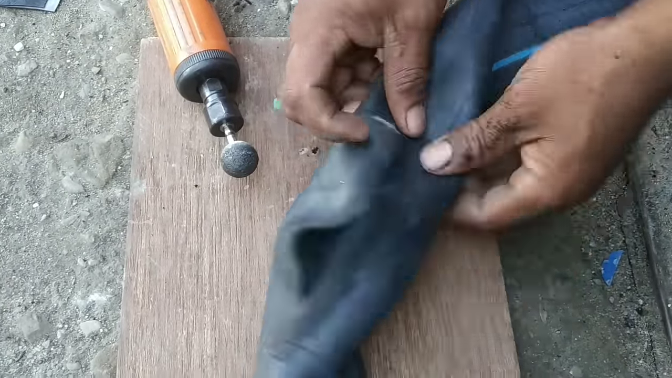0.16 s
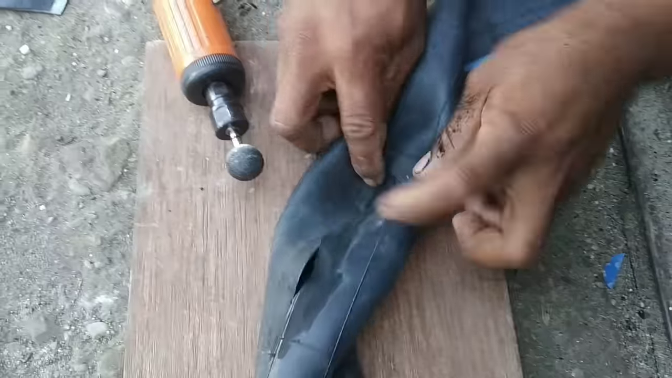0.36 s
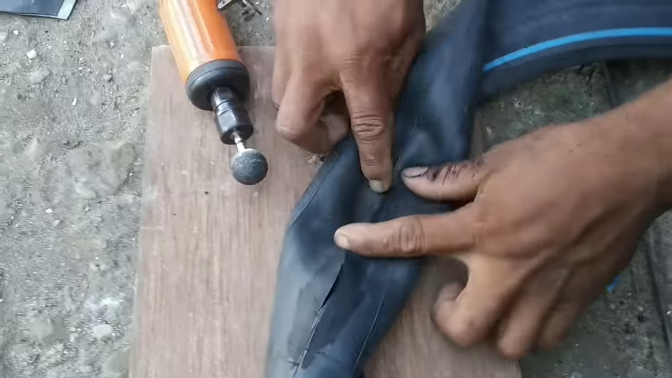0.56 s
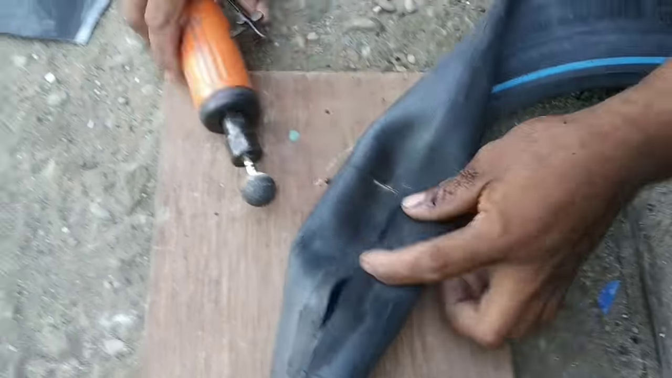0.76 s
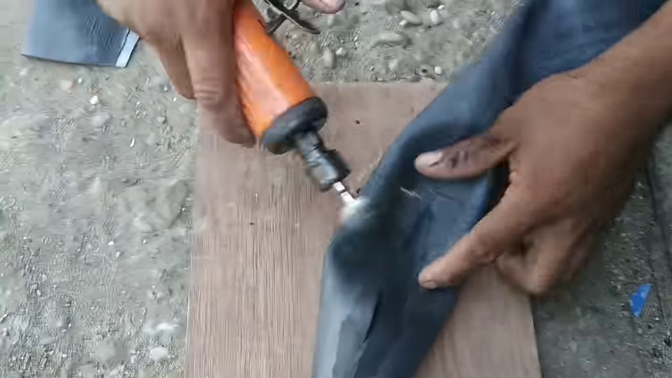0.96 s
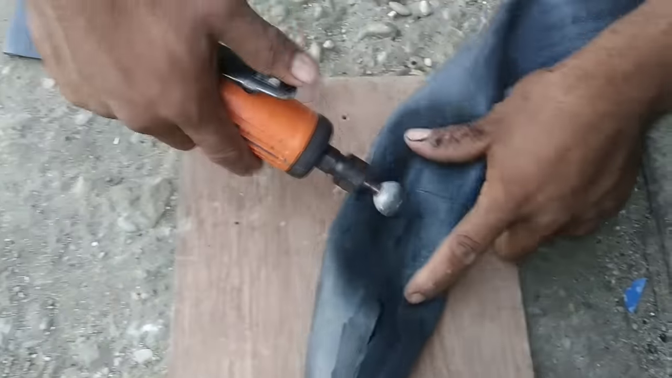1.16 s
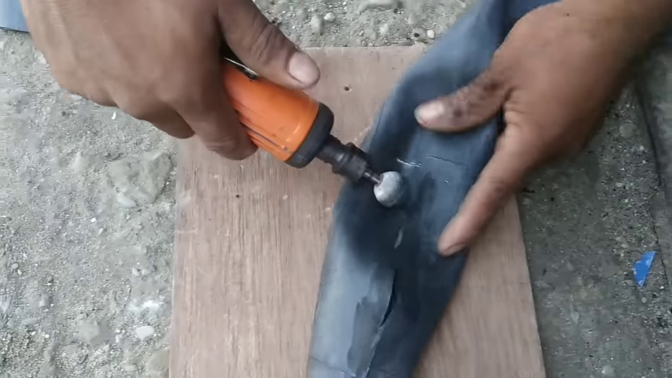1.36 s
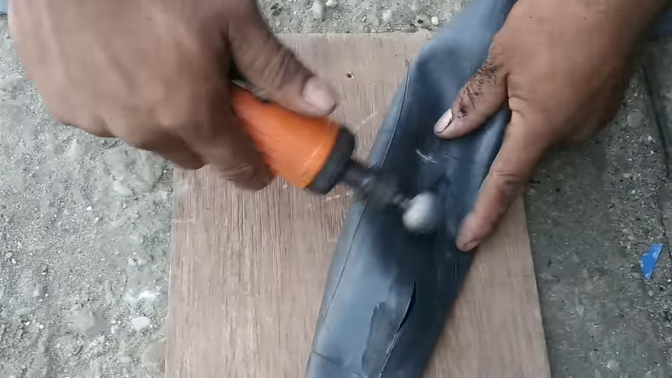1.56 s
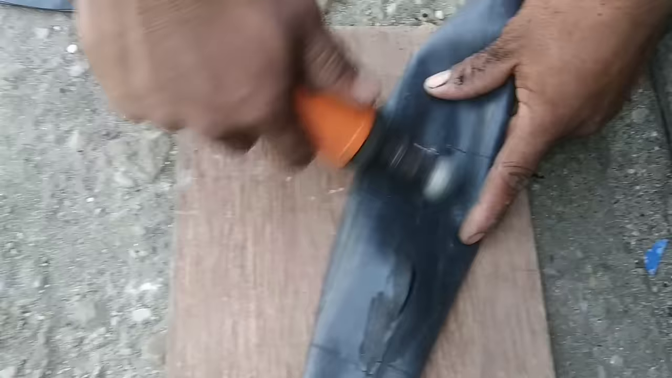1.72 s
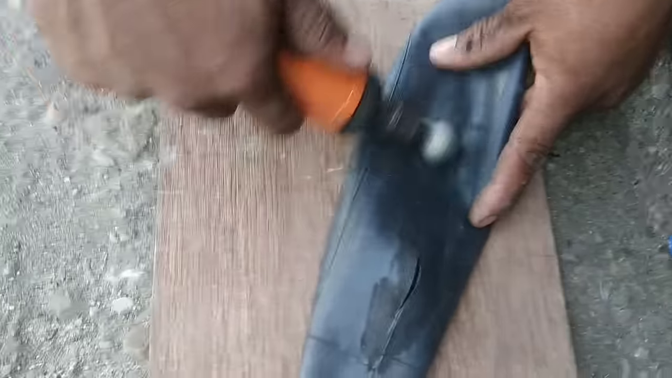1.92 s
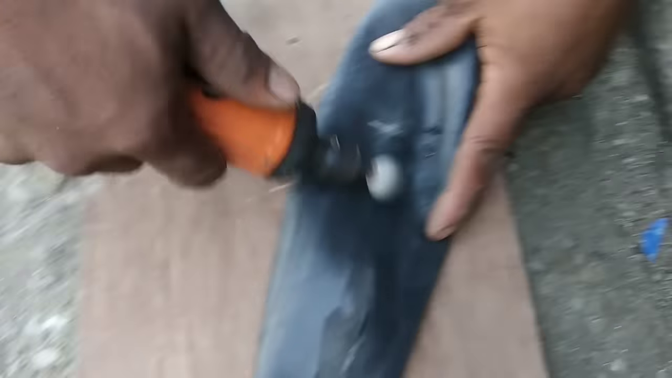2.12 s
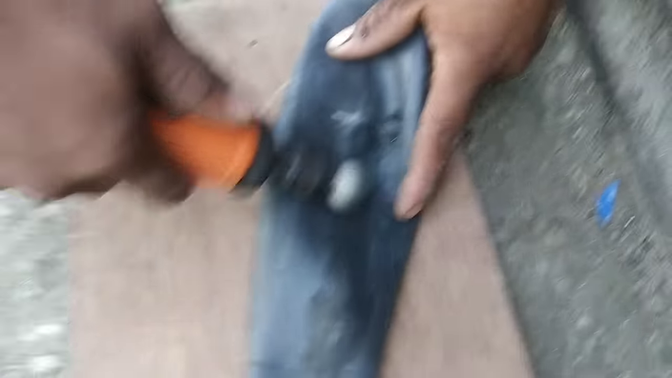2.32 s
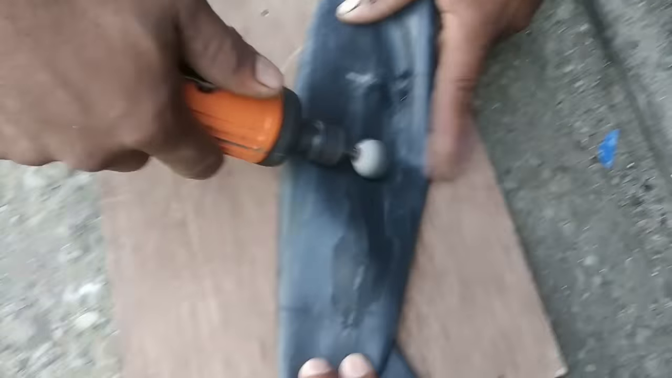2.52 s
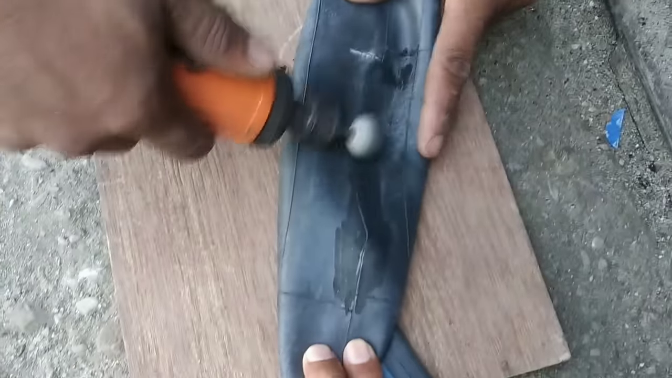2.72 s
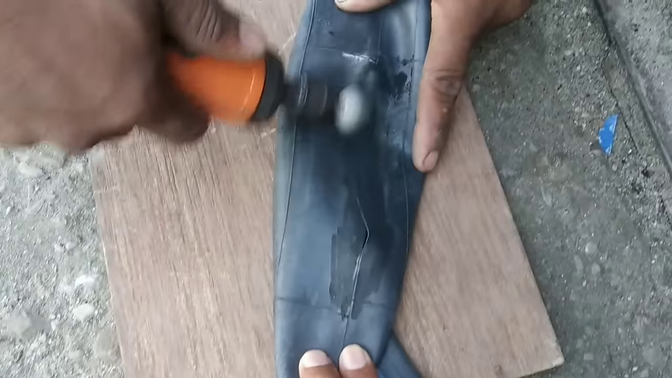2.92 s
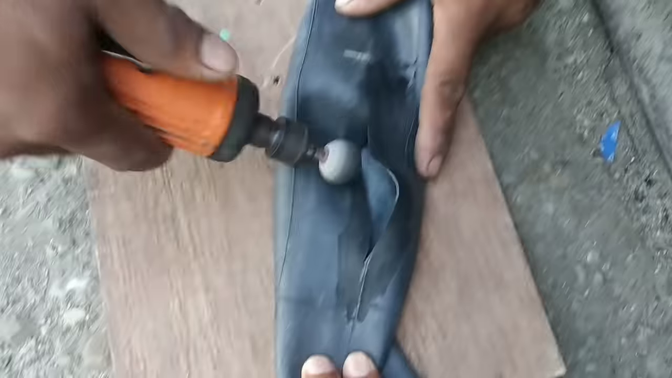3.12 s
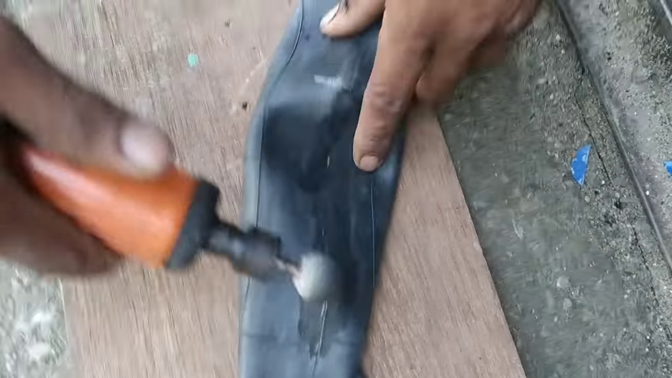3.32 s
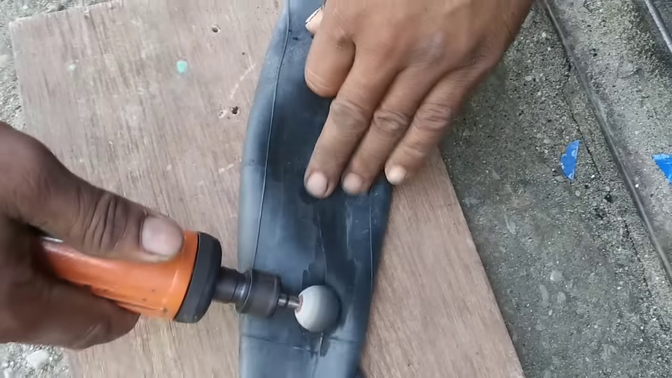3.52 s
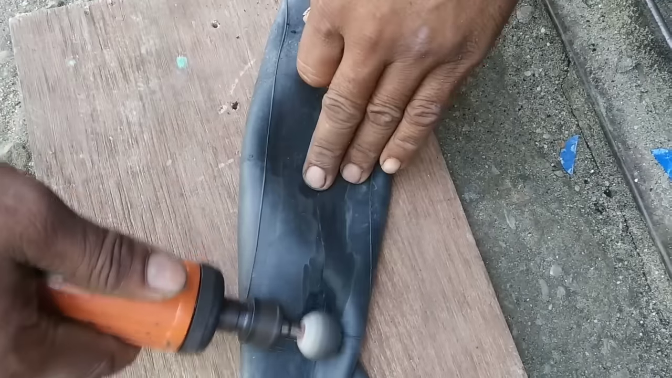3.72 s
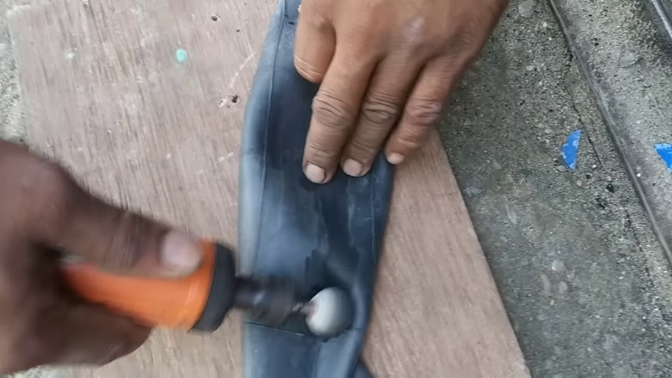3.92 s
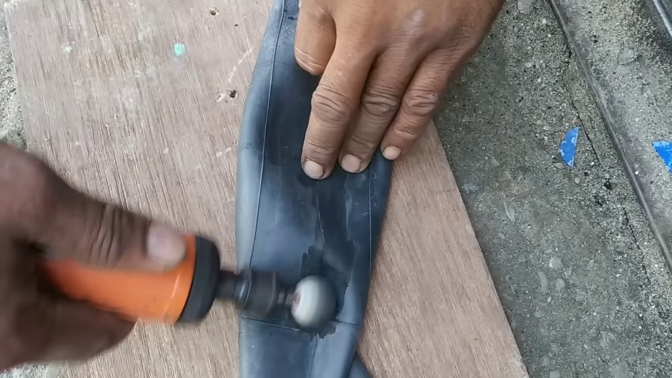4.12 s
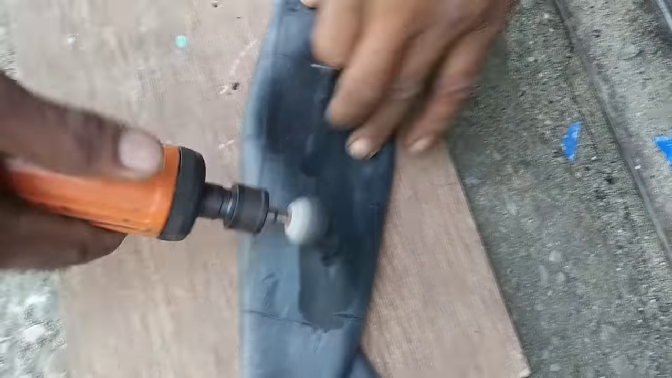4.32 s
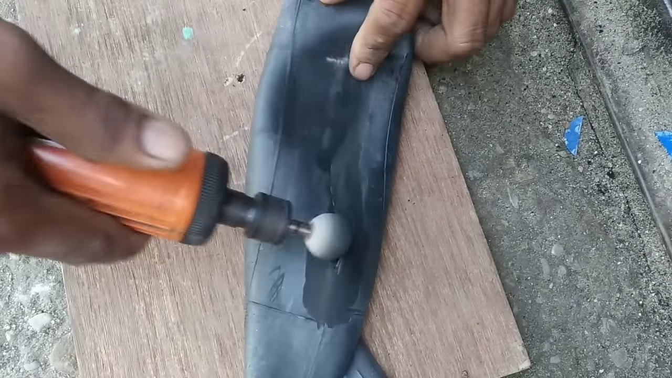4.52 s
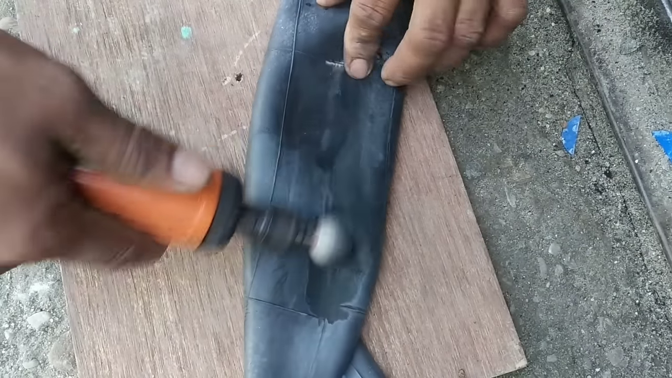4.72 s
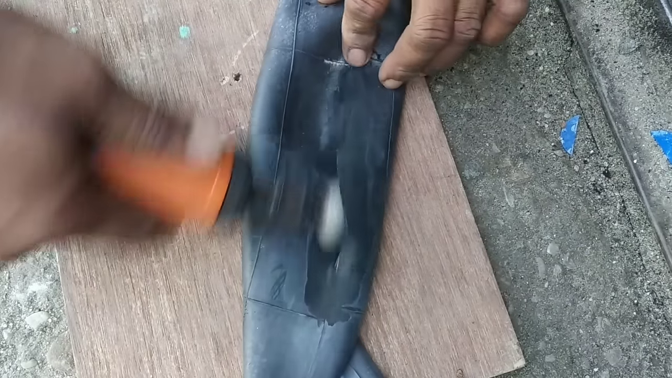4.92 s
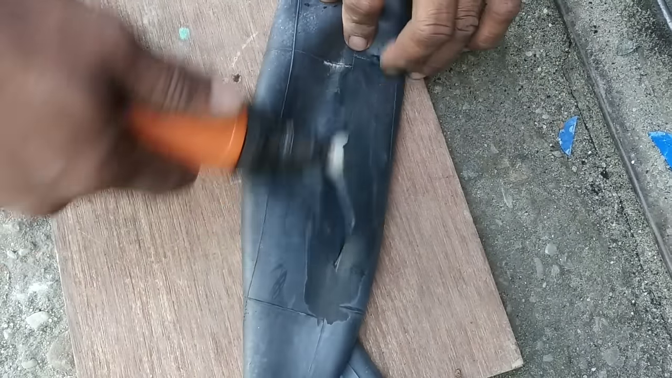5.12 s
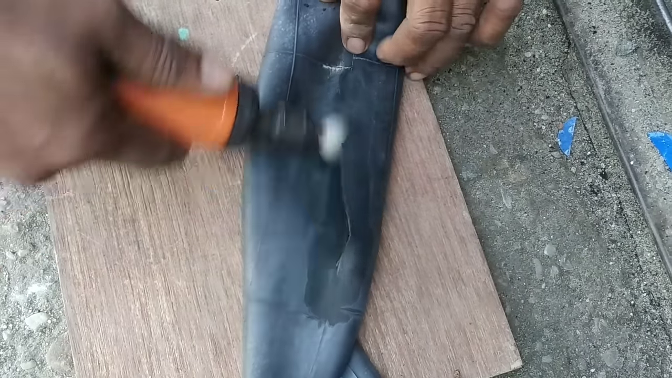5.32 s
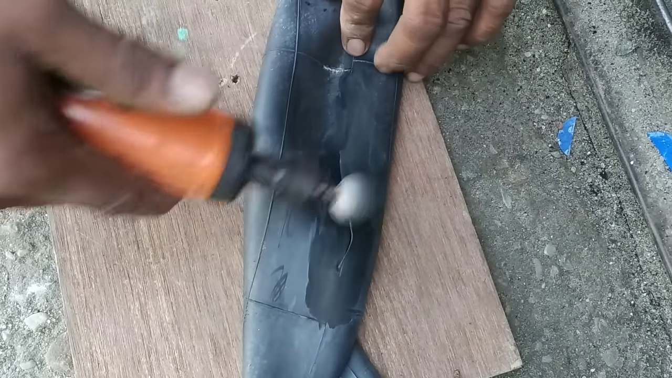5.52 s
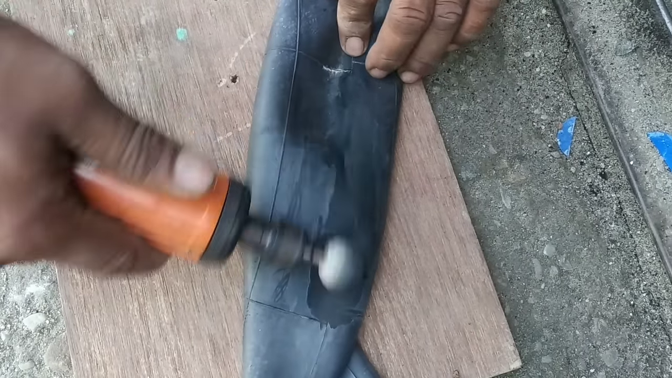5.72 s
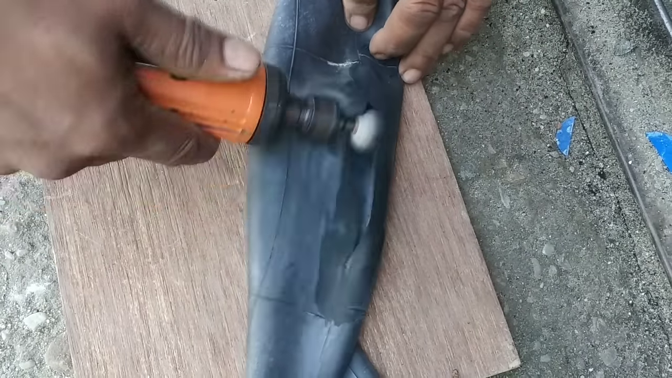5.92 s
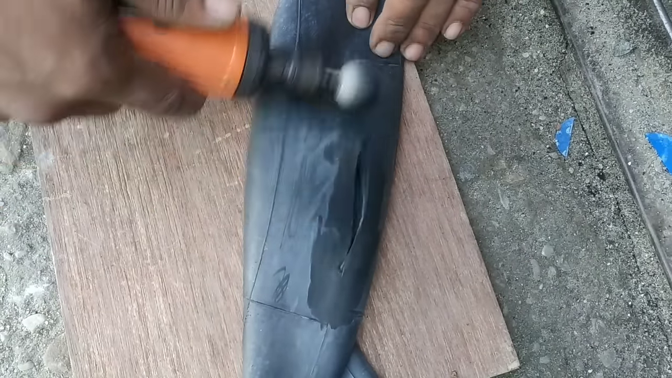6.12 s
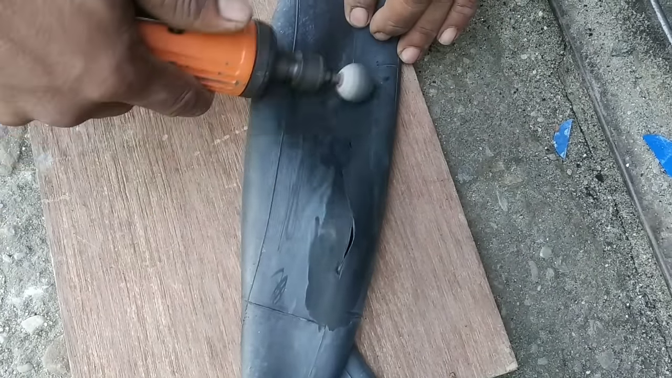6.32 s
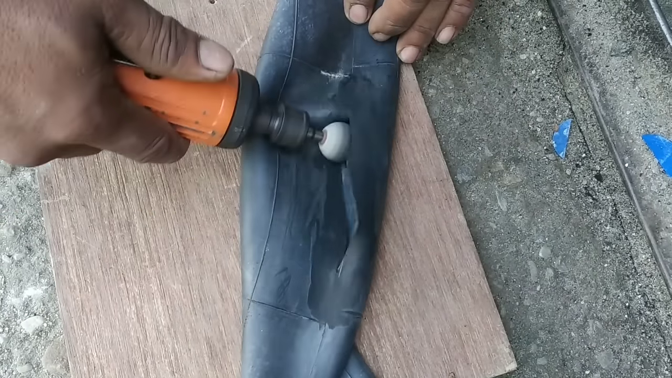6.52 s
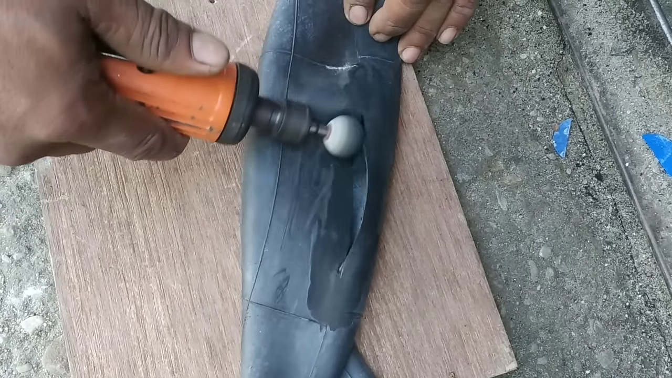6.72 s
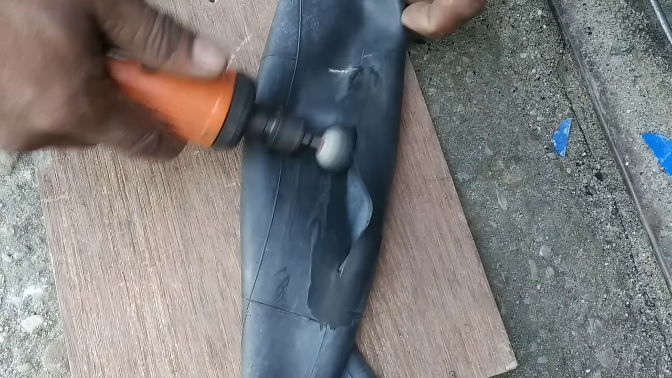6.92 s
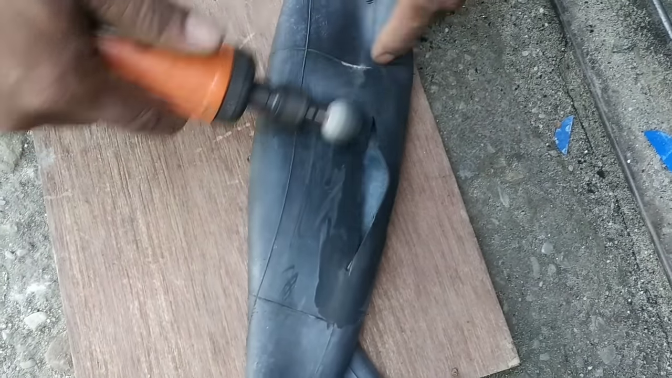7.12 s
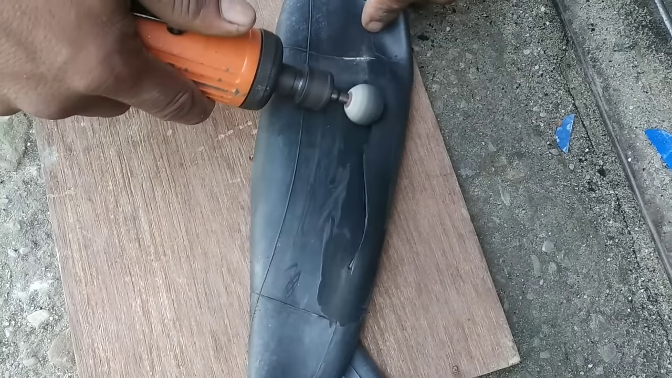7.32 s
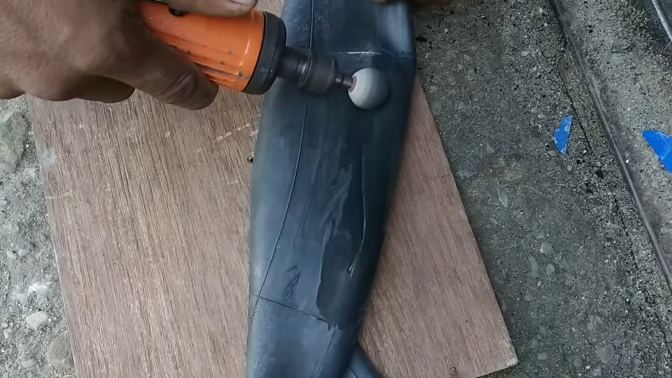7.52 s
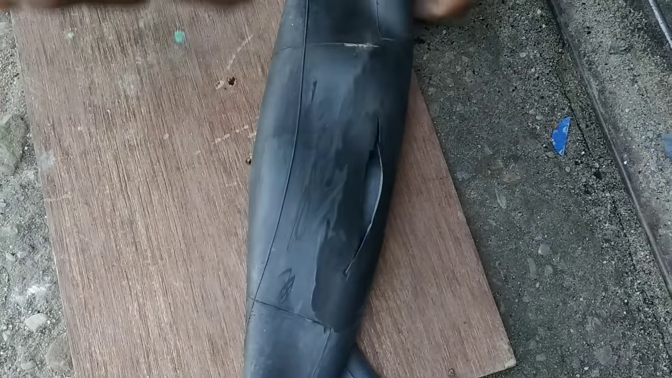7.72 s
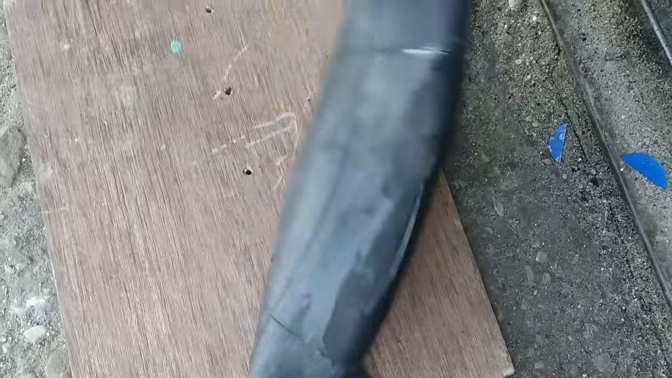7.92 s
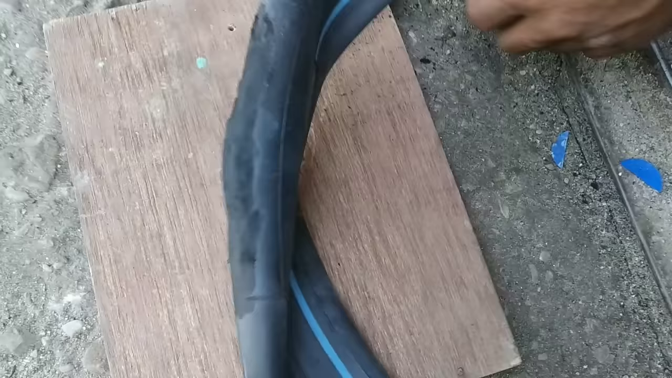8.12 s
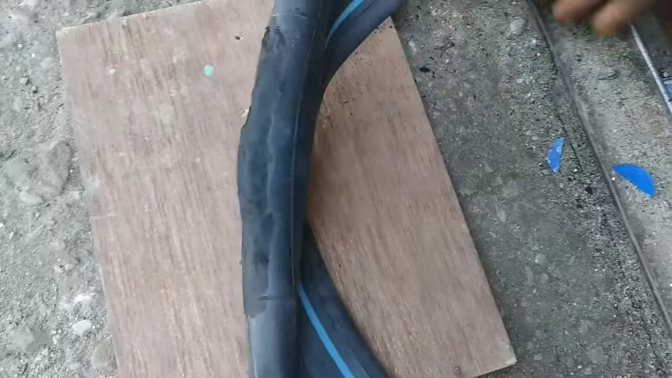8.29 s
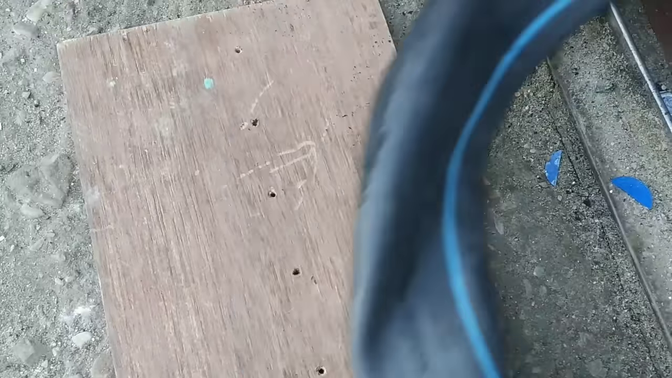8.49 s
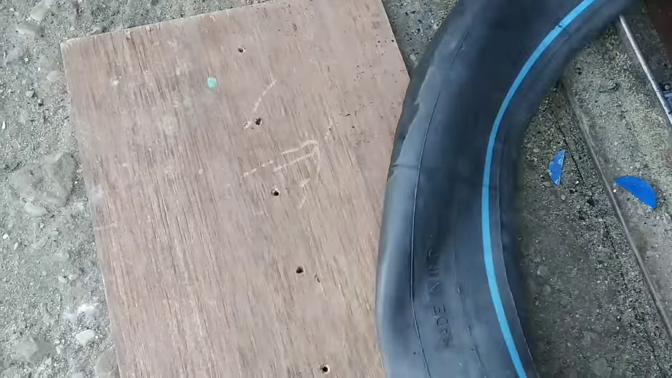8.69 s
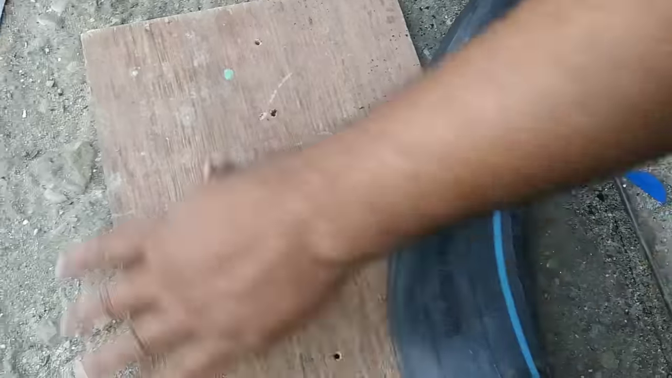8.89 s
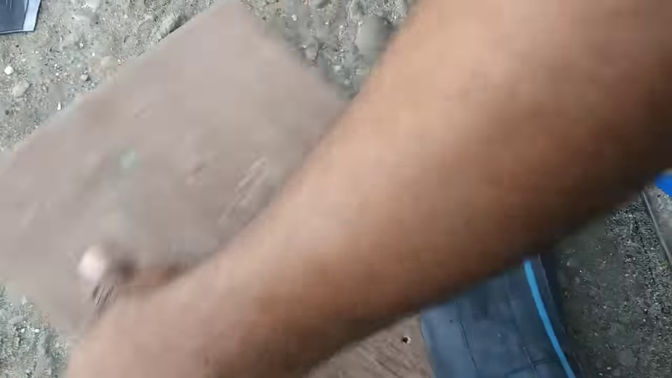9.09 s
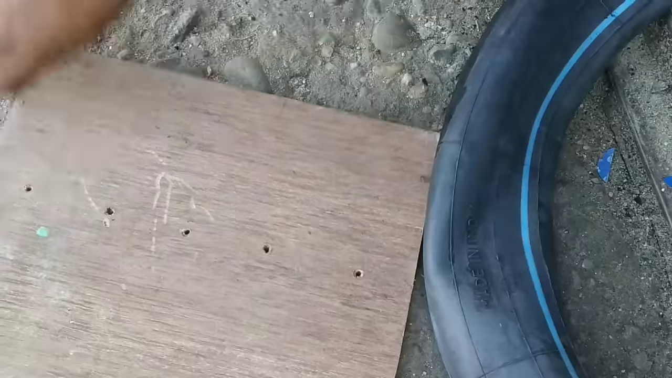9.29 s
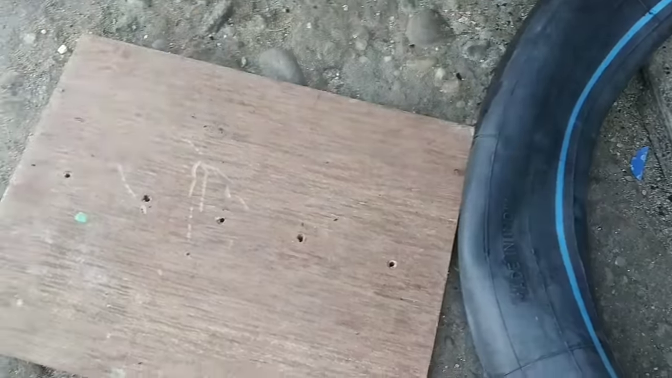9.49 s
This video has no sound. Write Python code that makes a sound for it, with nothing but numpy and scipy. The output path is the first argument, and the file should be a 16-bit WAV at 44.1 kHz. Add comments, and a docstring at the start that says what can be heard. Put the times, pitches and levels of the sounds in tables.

```python
"""An air die grinder buffs a rubber inner tube on a plywood board, in four short spells, in a workshop.
Like a siren, its four-vane motor chops the exhaust into a whine, heard over the loud hiss of turbulent
air; the pitch falls whenever the stone bites into the rubber and loads the rotor.
Around it are roadside traffic rumble, a leaking air coupling, fingers rubbing the tube, two toots of a
far motorbike horn, and the modes of the board, rung by knocks and by dragging over concrete."""
import sys
import numpy as np
from scipy import signal
from scipy.fft import rfft, irfft, next_fast_len
from scipy.io import wavfile

SR = 44100
rng = np.random.default_rng(int(sys.argv[2]) if len(sys.argv) > 2 else 0)


def file_out(sig):
    """Save sig as 16-bit WAV at sys.argv[1]."""
    # one column per channel
    cols = np.atleast_2d(sig).T
    # limit, then scale
    lim = np.clip(cols, -1, 1)
    pcm = np.round(lim * 32767).astype(np.int16)
    wavfile.write(sys.argv[1], SR, pcm)


N = 421155
T = np.arange(N) / SR


def from_db(db):
    """Amplitude ratio of a level in decibels."""
    return np.exp(np.maximum(db, -300) * (np.log(10) / 20))


def unit_rms(x):
    """Normalisation to unit power."""
    return x / np.sqrt(np.mean(x ** 2) + 1e-20)


def in_time(rows):
    """Linear interpolation in time, one curve for each column after the first."""
    times_s, *columns = np.transpose(rows)
    return [np.interp(T, times_s, column) for column in columns]


def at_hz(points, hz):
    """Interpolation on a logarithmic frequency axis."""
    points_hz, values = np.transpose(points)
    return np.interp(np.log(np.maximum(hz, 1)), np.log(points_hz), values)


def ramp(start_s, length_s):
    """Linear rise from 0 to 1."""
    return np.clip((T - start_s) / length_s, 0, 1)


def bump(centre_s, width_s):
    """Gaussian pulse of height 1."""
    return np.exp(-np.minimum(((T - centre_s) / width_s) ** 2, 40))


def stroke(start_s, end_s, level_db, fade_db_per_s=443):
    """Envelope of a rub: a plateau with exponential rise and decay."""
    return from_db(level_db - fade_db_per_s * np.abs(T - np.clip(T, start_s, end_s)))


def drift(rate_hz):
    """Low-pass noise: a smooth random wander of spread 1."""
    step = 40   # samples between computed points
    pole = np.exp(-2 * np.pi * rate_hz * step / SR)
    white = rng.standard_normal(N // step + 2002)
    slow = unit_rms(signal.lfilter([1], [1, -2 * pole, pole * pole], white)[2000:])
    return np.interp(np.arange(N) / step, np.arange(len(slow)), slow)


def sine(phase):
    """Sinusoid of a phase wrapped to one cycle."""
    return np.sin((phase % (2 * np.pi)).astype(np.float32))


def band(x, low_hz, high_hz):
    """Butterworth band-pass filter."""
    return signal.sosfilt(signal.butter(2, [low_hz, high_hz], "band", fs=SR, output="sos"), x + 1e-18)


def ring(force, hz, t60_s):
    """Damped oscillator: a unit impulse starts a decaying sine of height 1."""
    pole, angle = from_db(-60 / (t60_s * SR)), 2 * np.pi * hz / SR
    return signal.lfilter([0, np.sin(angle)], [1, -2 * pole * np.cos(angle), pole * pole], force + 1e-18)


def pan(balance_db):
    """Level difference, left over right, at constant total power."""
    gains = from_db(np.array([[.5], [-.5]]) * balance_db)
    return gains / np.sqrt(np.mean(gains ** 2, axis=0))


def delayed(x, delay_s):
    """Time delay, fixed or varying."""
    return np.interp(T - delay_s, T, x)


def stereo(x, lag_s):
    """Arrival-time difference: the left channel lags the right."""
    return np.array([delayed(x, lag_s), x])


# Likeness of left and right in the noise field: frequency_hz, coherence (0-1)
COHERENCE = [(100, 0.99), (400, 0.87), (1500, 0.04), (4000, 0.09), (15000, 0)]


def noise_field(spectrum, lag_s=0, balance=((1, 0), (2, 0))):
    """Partial coherence: a shared direct wave plus independent scattered waves, coloured, at rms 1."""
    size = next_fast_len(N)
    hz = np.arange(size // 2 + 1) * SR / size
    direct, *scattered = rfft(rng.standard_normal((3, size)))
    coherence = at_hz(COHERENCE, hz)
    lag = np.exp(-2j * np.pi * hz * [[lag_s], [0]])
    field = np.sqrt(coherence) * direct * lag + np.sqrt(1 - coherence) * np.array(scattered)
    low_hz, high_hz = spectrum[0][0] / 2, spectrum[-1][0] * 2
    skirts = 1 / np.sqrt((1 + (low_hz / (hz + 1)) ** 4) * (1 + (hz / high_hz) ** 4))
    colour = skirts * from_db(at_hz(spectrum, hz))
    return unit_rms(irfft(field * colour * pan(at_hz(balance, hz)), size)[:, :N])


# Spectra of the traffic and of the air leak: frequency_hz, density_db
TRAFFIC_SPECTRUM = [(25, -1.5), (54, 3), (110, 1), (160, 0), (275, -12.5), (640, -16), (1100, -24),
                    (2000, -37)]
LEAK_SPECTRUM = [(1500, -0.5), (2500, 3), (3400, 0), (5400, 0.5), (7200, 5.5), (9500, 6.5), (12000, 3),
                 (15500, 3)]
# Slow course of both: time_s, rumble_db, leak_db
BACKGROUND_LEVELS = [(0, -45, -47), (.8, -44.5, -45.5), (1.4, -45.5, -45.5), (3.3, -41, -40),
                     (5.5, -40.5, -43), (7.9, -46, -45.5), (8.6, -48.5, -47.5), (9.55, -50, -48)]


def traffic_and_leak(vane_hz, sink_db=-23):
    """Broadband noise of traffic and a leaking coupling; the rumble sinks while the tool is at speed."""
    held_hz = np.maximum(delayed(vane_hz, 0.015), delayed(vane_hz, 0.024))   # it returns a little late
    running = np.clip(held_hz / 950, 0, 1) ** 0.73
    rumble_db, leak_db = in_time(BACKGROUND_LEVELS)
    rumble = from_db(rumble_db + sink_db * running + 1.44 * drift(12.6)) * noise_field(TRAFFIC_SPECTRUM)
    leak = from_db(leak_db + 1.1 * drift(27)) * noise_field(LEAK_SPECTRUM)
    return rumble + leak


# Fingers rubbing the tube: start_s, end_s, centre_hz, level_db
FINGER_RUBS = [(0, 0.098, 2480, -53.5), (0.187, 0.266, 2450, -59), (.9, 0.983, 4470, -52),
               (7.892, 7.97, 4500, -48), (8.273, 8.3, 4500, -55), (8.407, 8.493, 3900, -52)]


def fingers(edge_ratio=1.19, grip_db=3):
    """Stick-slip friction of skin on rubber: bands of noise that flutter as the grip changes."""
    rubs = 0
    for start_s, end_s, hz, level_db in FINGER_RUBS:
        friction = unit_rms(band(rng.standard_normal(N), hz / edge_ratio, hz * edge_ratio))
        rubs += stroke(start_s, end_s, level_db) * friction
    return stereo(rubs * from_db(grip_db * drift(70)), lag_s=0.0001)


# Toots of the far horn: start_s, end_s, level_db
HORN_TOOTS = [(0.471, 0.545, -50), (0.66, 0.742, -48.5)]
# Its spectrum: harmonic_number, gain_db
HORN_HARMONICS = [(6, -19), (7, -2), (8, -1.5), (9, -10.5), (12, -14)]
# Reflections from house fronts: delay_s, gain_db
HOUSE_ECHOES = [(0.0121, -6), (.029, -21), (.058, -14)]


def horn(pitch_hz=401, edge_s=0.023, waver=0.007, rough_rad=0.04, rough_db=5):
    """Forced vibration: a buzzing diaphragm rings a tone disc near 3 kHz, blurred by street echoes."""
    phase = 2 * np.pi * np.cumsum(pitch_hz * (1 + waver * drift(39))) / SR + rough_rad * drift(160)
    gate = sum(from_db(db) * np.clip(np.minimum(T - start_s, end_s - T) / edge_s + .5, 0, 1)
               for start_s, end_s, db in HORN_TOOTS)
    buzz = sum(from_db(db + rough_db * drift(60)) * np.sin(k * phase) for k, db in HORN_HARMONICS)
    toots = np.sqrt(2) * gate * buzz
    echoes = sum(from_db(db) * delayed(toots, delay_s) for delay_s, db in HOUSE_ECHOES)
    return stereo(toots + echoes, lag_s=0.00005)


# Knocks and jolts of the board: time_s, blow_db, crack_db
BOARD_KNOCKS = [(0.599, -28.5, -60), (0.92, -36, -56), (0.992, -38, -64), (8.034, -36, -52),
                (8.151, -38, -65), (8.324, -30.5, -49), (8.358, -38, -64), (8.582, -35.5, -63),
                (8.935, -32, -62), (9.001, -26, -60), (9.028, -26, -44), (9.074, -19.5, -52),
                (9.088, -25.5, -45), (9.117, -25, -39), (9.146, -31, -31), (9.163, -22, -57),
                (9.173, -19.5, -47), (9.209, -19, -33.5), (9.247, -22, -57), (9.279, -21, -44),
                (9.303, -21, -43), (9.328, -22, -50)]


def impacts(crunch=0.087, rise_s=0.0029, crunch_s=0.0085, crack_s=0.0035):
    """Impulsive excitation: each knock crushes grit, giving a rough blow and a brief crack."""
    lead = SR // 100   # grit gives way just before the jolt
    age_s = T[:SR // 20] - T[lead]
    onset, since_s = np.exp(np.minimum(age_s, 0) / rise_s), np.maximum(age_s, 0)
    blows, cracks = np.zeros(N), np.zeros(N)
    for time_s, blow_db, crack_db in BOARD_KNOCKS:
        at = round(time_s * SR)
        span = slice(at - lead, at - lead + len(age_s))
        grit = onset * rng.standard_normal(len(age_s))
        blows[at] += from_db(blow_db)
        blows[span] += from_db(blow_db) * crunch * grit * np.exp(-since_s / crunch_s)
        cracks[span] += from_db(crack_db) * grit * np.exp(-since_s / crack_s)
    return blows, cracks


# Modes of the plywood: frequency_hz, gain_db, free_t60_s
PLYWOOD_MODES = [(352, -12, 0.029), (490, -8, 0.022), (663, -6.5, 0.072), (773, -6, 0.091),
                 (920, -3.5, 0.097), (1070, -1, 0.013), (1293, -0.5, 0.026), (1530, -1, 0.017),
                 (1820, -4, 0.031), (2020, -6.5, 0.019), (2730, -13, 0.019), (4000, -5, 0.0059),
                 (5000, -10, 0.0063)]
# Rubber and board sliding: start_s, end_s, level_db
BOARD_SLIDES = [(7.918, 7.973, -57), (8.423, 8.467, -49), (9.023, 9.146, -45.5), (9.16, 9.357, -43)]


def board(knock_gain_db=-8.5, crack_gain_db=12, grit_gain_db=-16, grains_per_s=700, jammed_ratio=0.45):
    """Modal vibration: knocks and sliding grains ring the plywood; ground contact damps the knocks."""
    blows, cracks = impacts()
    grains = (rng.random(N) < grains_per_s / SR) * rng.standard_normal(N)
    sliding = sum(stroke(*slide) for slide in BOARD_SLIDES)
    knocks, scrape = 0, 0
    for k, (hz, gain_db, free_t60_s) in enumerate(PLYWOOD_MODES):
        contact_db = 4.1 * np.array([drift(9.4), drift(13)])   # the point of contact wanders
        coupling = (-1) ** k * from_db(gain_db + contact_db)
        knocks += coupling * ring(blows, hz, free_t60_s * jammed_ratio)
        scrape += coupling * ring(grains, hz, free_t60_s)
    wood = from_db(knock_gain_db) * knocks + sliding * unit_rms(scrape)
    grit = from_db(crack_gain_db) * cracks + from_db(grit_gain_db) * sliding * unit_rms(grains)
    return wood * pan(-1.2) + stereo(band(grit, 1600, 7300), lag_s=0.0001)


VANES, WORKING_HZ = 4, 1200   # WORKING_HZ is the nominal vane-passing frequency
TOOL_LAG_S = 0.0003383   # the tool's sound reaches the left channel later
# Spells of grinding: pressed_s, at_speed_s, released_s, free_vane_hz, air_db
GRINDING_SPELLS = [(1.452, 1.575, 3.102, 1205, -35.8), (3.338, 3.47, 4.296, 1148, -35.3),
                   (4.447, 4.52, 5.388, 1180, -35.5), (5.49, 5.585, 7.667, 1158, -35.9)]


def motor(grab=0.04, valve_s=0.03, coast_s=0.04, coast_power=3.5, air_db_per_hz=0.03, bleed_db_per_s=97):
    """Air drive against friction: vane-passing frequency and air flow through run-up, work and coast."""
    lost_hz = drag() * (1 + grab * drift(20))   # the rubber grips unevenly
    vane_hz, flow = 0, 1e-5
    for pressed_s, at_speed_s, released_s, free_hz, air_db in GRINDING_SPELLS:
        run_up = ramp(pressed_s, at_speed_s - pressed_s) ** 1.6
        since_s = np.maximum(T - released_s, 0)
        coast = (1 + since_s / (coast_power * coast_s)) ** -coast_power   # falls fast, then lingers
        loaded_hz = free_hz - lost_hz
        vane_hz = np.maximum(vane_hz, run_up * loaded_hz * coast)
        # A faster rotor passes more air; on release the flow drops, holds, then bleeds away.
        driven_db = -5 * (1 - run_up) + run_up * air_db_per_hz * (loaded_hz - WORKING_HZ)
        bleed_db = -9.5 - bleed_db_per_s * np.maximum(since_s - 0.12, 0)
        opened, shut = ramp(pressed_s, valve_s), ramp(released_s, valve_s)
        flow = np.maximum(flow, opened * from_db(air_db + (0.5 - shut) * driven_db + shut * bleed_db))
    return vane_hz, 20 * np.log10(flow)


def per_spell(values):
    """One value held through each spell and its run-down, gliding to the next during run-up."""
    run_ups_s = np.ravel([spell[:2] for spell in GRINDING_SPELLS])
    return np.interp(T, run_ups_s[1:], np.repeat(values, 2)[:-1])


# The throttle valve snapping open: start_s, level_db
VALVE_SPITS = [(1.453, -29), (4.447, -30)]


def valve(decay_s=0.016):
    """Transient jet: a spit of air decays exponentially as the lever is pressed."""
    spits = sum(from_db(db) * (T >= s) * np.exp(-np.abs(T - s) / decay_s) for s, db in VALVE_SPITS)
    return stereo(spits * unit_rms(band(rng.standard_normal(N), 800, 10000)), TOOL_LAG_S)


# Hiss at the exhaust port: frequency_hz, density_db
EXHAUST_SPECTRUM = [(200, -20.5), (600, -27), (1500, -14.5), (1900, -21.5), (2450, -8.5), (3200, -11),
                    (3700, -16), (4300, -5.5), (5600, -6.5), (6200, -9), (6900, -1.5), (8100, -7.5),
                    (9000, -10), (9900, 0.5), (11000, -4), (12400, -8), (13600, -10.5), (15000, -16)]
# Directivity of the exhaust: frequency_hz, left_over_right_db
EXHAUST_BALANCE = [(300, 0.5), (900, -2), (1500, 23), (2500, 0), (3400, -5), (4400, 3), (5500, 1),
                   (6900, 5.5), (8700, -4.5), (10200, 2), (15000, -1.5)]
# Resonances between tool, hand and board: centre_hz, width_hz, then gain_db in each of the four spells
GRIP_RESONANCES = [(4860, 200, -0.5, -7, -2, 3.5), (4750, 210, 0, 2.5, 4, 0), (5190, 230, 1.5, 7, 2.5, 2),
                   (6300, 130, 7.5, 8, 2, 3), (6430, 140, -3.5, 3.5, 4.5, 2), (7150, 900, 2.5, 4.5, 4, 2.5),
                   (8900, 650, 6, 1.5, 6.5, 7), (11500, 540, -0.5, 1.5, -2, -22),
                   (12500, 200, 6.5, 7, 8, 8.5), (15000, 1060, 8, 10, 9, 8.5)]


def exhaust(vane_hz, phase, flow_db, gain_db=4.5, swell_db=1.2, flutter_db=1.24, echo=0.35):
    """Turbulent jet noise, pulsed by the vanes and comb-filtered by its reflection from the board."""
    hiss = noise_field(EXHAUST_SPECTRUM, TOOL_LAG_S, EXHAUST_BALANCE)
    for hz, width_hz, *spell_db in GRIP_RESONANCES:
        gain = from_db(per_spell(spell_db) + swell_db * drift(4.7))
        hiss += (gain - 1) * signal.lfilter(*signal.iirpeak(hz, hz / width_hz, fs=SR), hiss)
    echo_s = 0.0019 + 0.00006 * drift(1.8)   # the path changes as the tool moves
    hiss += echo * np.array([delayed(channel, echo_s) for channel in hiss])
    pulsing = 0.27 * np.cos(phase) + 0.056 * np.cos(phase / VANES)   # once a vane, once a turn
    puffs = 1 + np.clip(vane_hz / 200, 0, 1) * pulsing
    return from_db(flow_db + gain_db + flutter_db * drift(40)) * puffs * hiss


# Housing resonances rung by slow puffs: centre_hz, width_hz, gain_db
HOUSING_BANDS = [(610, 460, 4), (1364, 180, 6.5), (2720, 420, 7.5)]


def sputter(vane_hz, phase, flow_db, breathiness=0.54):
    """Pulse-excited resonance: far below speed, each vane lets an uneven puff into the housing."""
    vane_passes = np.diff(np.floor(phase / (2 * np.pi)), prepend=0)
    puffs = vane_passes * (1 + rng.standard_normal(N))
    air = unit_rms(puffs) + breathiness * rng.standard_normal(N) * (1 + np.cos(phase))
    housing = sum(from_db(db) * band(air, hz - width_hz / 2, hz + width_hz / 2)
                  for hz, width_hz, db in HOUSING_BANDS)
    labouring = np.interp(vane_hz, [0, 200, 600, 850, 1000], [0.97, 1, 0.9, 0.41, 0])
    return stereo(from_db(flow_db) * labouring * unit_rms(housing), lag_s=0.00025)


def shaded_partial(phase, lag_rad, balance_db, flicker_db):
    """Acoustic shadowing: the moving hands put brief dips in a partial of rms 1, unlike on each side."""
    shade = (np.array([drift(28), drift(28)]) + drift(28)) / np.sqrt(2)
    flicker = unit_rms(from_db(flicker_db * np.minimum(shade, 0.6)))   # boosts are capped
    return np.sqrt(2) * flicker * pan(balance_db) * sine(np.array([phase - lag_rad, phase]))


# First four harmonics as the tool turns in the hand: time_s, first_db, second_db, third_db, fourth_db
WHINE_AIM = [(1.6, -1, -13, 2.5, -9), (1.75, -0.5, -11, -7, -18), (2.0, -2.5, -4.5, -4, -11),
             (2.5, -0.5, -5.5, -5, -9), (3.049, -1, -2.5, -6.5, -11.5), (3.549, -6.5, -0.5, -4, -14),
             (3.8, -11.5, -7.5, -8, -16), (4.25, -3.5, -5, -4, -9), (4.599, -2.5, -3.5, -5.5, -8),
             (4.9, -5.5, -6, -4.5, -15), (5.301, -0.5, -4, -4, -6), (5.65, -2.5, -1.5, -4.5, -4),
             (6.1, -3.5, -10.5, 1.5, -5), (6.3, -2.5, -2, -2.5, -13.5), (6.8, -2.5, -10, -5, -6),
             (6.93, -3, -1.5, -7, -8.5), (7.1, -3.5, -12, -3.5, -11.5), (7.55, -3.5, -4.5, -0.5, -12)]
# Path of each to the microphone: left_over_right_db, left_lag_s, flicker_db
WHINE_ARRIVALS = [(-3, 0.00022, 4.5), (1.5, 0.00034, 8.5), (1, .00037, 5.5), (26, 0.000294, 5.5)]
# Response of the housing as they sweep through it: frequency_hz, gain_db
HOUSING_RESPONSE = [(250, -8.5), (450, -9.5), (640, 8), (800, -10.5), (950, 6), (1020, 1), (1100, -3),
                    (1200, 0.5), (1500, 10), (1900, -4.5), (2100, -0.2), (2300, -1), (2600, -0.5),
                    (2920, 6), (3100, 2), (3500, 0.8), (4300, 4.5), (4430, 7), (4600, 4), (5000, 11)]


def whine(vane_hz, phase, gain_db=-36, ragged_db=4, stumble_rad=0.79, echo=0.21, echo_s=0.0078):
    """Siren principle: each vane lets out a puff; uneven puffs rasp, and load makes them flutter."""
    bearing, slowness = load(), np.clip(1 - vane_hz / 1000, 0, 1)
    jitter_rad = (0.035 + 0.04 * bearing) * drift(140)
    phase = phase + jitter_rad + 0.014 * np.sin(phase / VANES)   # the rotor is slightly lopsided
    phase += stumble_rad * slowness * (drift(107) + np.sin(phase / VANES))   # when slow, it lurches
    ragged = from_db(ragged_db * np.sqrt(slowness) * (drift(82) - 1))
    choke_s = 0.0039   # the tone breaks as the valve shuts
    choke = 1 - sum(bump(released_s + choke_s, choke_s) for _, _, released_s, _, _ in GRINDING_SPELLS)
    envelope = from_db(gain_db) * np.clip(vane_hz / 250, 0, 1) * ragged * choke
    rasp_db = 0.55 * drift(260)
    tone = 0
    for k, aim_db in enumerate(in_time(WHINE_AIM), 1):
        balance_db, lag_s, flicker_db = WHINE_ARRIVALS[k - 1]
        hz = k * vane_hz
        gain = from_db(aim_db + at_hz(HOUSING_RESPONSE, hz) + k * rasp_db)
        sharpness = np.clip(vane_hz / WORKING_HZ, .01, 1) ** (0.79 * (k - 1))   # slow puffs are rounder
        interference = 1 + echo * np.cos(2 * np.pi * hz * echo_s)   # an echo adds or cancels
        angle = k * phase + 0.45 * (k / 4) ** 4 * drift(160)   # turbulence frays the highest harmonic
        partial = shaded_partial(angle, 2 * np.pi * hz * lag_s, balance_db, flicker_db - 1.5 * bearing)
        tone += gain * sharpness * interference * partial
    return envelope * tone


def shaft(vane_hz, phase, flow_db, gain_db=-27, rise_db_per_decade=8, flicker_db=4.5, chatter_rad=0.82):
    """Rotational asymmetry: unequal vanes and the chattering stone add rough shaft-rate harmonics."""
    harmonics = 0
    for k in range(1, 16):
        if k % VANES:
            angle = k * phase / VANES + rng.uniform(0, 2 * np.pi) + chatter_rad * drift(44)
            level_db = rise_db_per_decade * np.log10(k) + flicker_db * drift(9.8)
            harmonics += from_db(level_db) * sine(angle)
    return stereo(harmonics * from_db(flow_db + gain_db) * np.clip(vane_hz / 900, 0, 1), lag_s=0.0002)


# High vane harmonics, relative to the air flow: frequency_hz, gain_db
OVERTONE_SPECTRUM = [(5400, -20), (6200, -7), (6900, -6), (7500, -14), (8700, -15), (9300, -13), (9750, -2),
                     (10300, -1.5), (10800, -11), (11400, -12), (12300, -9.5), (13000, -10)]
# The port's whistle, riding on whichever harmonic lies near its pitch: time_s, swell_db
WHISTLE_SWELLS = [(1.5, -13), (3.1, -14), (3.58, 7), (3.75, -23), (4.28, 9), (4.7, -1), (5.7, 3), (6.95, 3),
                  (7.2, 8), (7.36, 11.5), (7.6, -1)]


def overtones(vane_hz, phase, flow_db, whistle_hz=9780, whistle_width_hz=420, fade_db=4.5):
    """Phase modulation blurs the high harmonics under load; the swelling whistle steadies the nearest."""
    sharpness = np.clip(vane_hz / 1050, 0, 1) ** 3   # only a fast rotor cuts sharp puffs
    swell_db, = in_time(WHISTLE_SWELLS)
    locking = np.clip(swell_db / 15, 0, .75)
    blur_rad = 0.29 + 0.59 * load()
    tone = 0
    for k in (6, 8, 9, 10, 11):
        hz = k * vane_hz
        in_tune = 1 / (1 + ((hz - whistle_hz) / whistle_width_hz) ** 4)
        shift_db = in_tune * swell_db + (1 - in_tune) * fade_db * drift(2.2)
        gain = from_db(flow_db + at_hz(OVERTONE_SPECTRUM, hz) + shift_db)
        wander_rad = blur_rad * drift(200) + 0.95 * drift(41)
        angle = k * phase + (1 - in_tune * locking) * wander_rad
        balance_db = at_hz(EXHAUST_BALANCE, k * WORKING_HZ)
        tone += gain * shaded_partial(angle, 2 * np.pi * hz * TOOL_LAG_S, balance_db, flicker_db=5)
    return sharpness * tone


def grinder(vane_hz, flow_db, waver=0.008, judder=0.25):
    """Frequency modulation: one rotor drives five sounds; it wavers, and judders when the stone bites."""
    vane_hz = vane_hz * (1 + waver * drift(30)) + judder * bites() * drift(160)
    phase = 2 * np.pi * np.cumsum(vane_hz) / SR
    tone = whine(vane_hz, phase)   # the vanes chop the air even while coasting
    return tone + sum(source(vane_hz, phase, flow_db) for source in (overtones, shaft, exhaust, sputter))


# Stray exhaust air sweeping over the microphone: peak_s, level_db
EXHAUST_GUSTS = [(1.57, -40.5), (2.0, -43.5), (3.49, -43), (4.28, -48), (4.42, -53), (5.7, -45.5)]


def draught(flow_db, steady_db=-34, rise_s=0.031, fall_s=0.083):
    """Wind noise: turbulent pressure rumbles in each channel separately; gusts come fast and die away."""
    gusts = sum(from_db(db) * np.exp(-np.maximum((peak_s - T) / rise_s, (T - peak_s) / fall_s))
                for peak_s, db in EXHAUST_GUSTS)
    turbulence = unit_rms(band(rng.standard_normal((2, N)), low_hz=4, high_hz=50))
    return (gusts + from_db(flow_db + steady_db)) * turbulence


# The stone leant on the rubber and rocked: start_s, end_s, bear_down_s, sag_hz, swing_hz, strokes_per_s
STONE_LEANS = [(1.601, 3.115, 0.23, 176.5, 18.5, 9.3), (3.576, 4.282, .12, 103.8, 21, 9.9),
               (4.593, 5.203, 0.078, 91.7, 13, 7.94), (5.131, 5.432, 0.041, 70.64, 25.6, 10),
               (6.068, 6.66, .17, 71.95, 15, 8), (6.79, 7.804, .27, 84.06, 4.44, 4.95)]


def drag(lift_s=0.09):
    """Friction loading: vane-passing frequency lost to leaning, rocking strokes and bites, in Hz."""
    lost_hz = bites()
    for start_s, end_s, bear_down_s, sag_hz, swing_hz, strokes_per_s in STONE_LEANS:
        age_s = np.maximum(T - start_s, 0)
        pressure = (1 - np.exp(-age_s / bear_down_s)) * (1 - ramp(end_s - lift_s, lift_s))
        lost_hz += pressure * (sag_hz + swing_hz * np.cos(2 * np.pi * strokes_per_s * age_s))
    return lost_hz


def load(full_hz=150):
    """Relative load: how hard the stone bears on the rubber, 0-1."""
    return np.clip(drag() / full_hz, 0, 1)


# The stone catching in the rubber: time_s, lost_hz
STONE_BITES = [(2.995, 83.8), (3.875, 34.5), (4.715, 25.3), (5.04, 25.1), (5.255, 25.1), (5.314, 79.9),
               (5.74, 27.9), (5.8, 41.9), (5.91, 121.7), (6.52, 130), (6.659, 95.2), (6.871, 45.3),
               (6.965, 99.7), (7.201, 24.9)]


def bites(width_s=0.025):
    """Transient loading: each catch lowers the vane-passing frequency for an instant, in Hz."""
    return sum(lost_hz * bump(time_s, width_s) for time_s, lost_hz in STONE_BITES)


# Loose vanes rattling as the rotor runs down: peak_s, level_db
VANE_RATTLES = [(3.2, -43.5), (4.4, -49), (7.749, -40.5)]


def rattle(vane_hz, width_s=0.029):
    """Periodic impact: each passing vane slaps the housing and gives a burst of noise."""
    contact = np.maximum(np.cos(2 * np.pi * np.cumsum(vane_hz) / SR), 0) ** 2
    slaps = unit_rms(band(contact * rng.standard_normal(N), 2250, 3450))
    swell = sum(from_db(db) * bump(peak_s, width_s) for peak_s, db in VANE_RATTLES)
    return stereo(swell * slaps, TOOL_LAG_S)


def scene():
    """Superposition in the open air: the tool and the work close by, the street behind them."""
    vane_hz, flow_db = motor()
    tool = grinder(vane_hz, flow_db) + rattle(vane_hz) + valve() + draught(flow_db)
    return tool + board() + fingers() + horn() + traffic_and_leak(vane_hz)


def record(dry):
    """Soft saturation rounds the highest peaks, and a steep low-pass filter cuts the top."""
    ceiling, cutoff_hz = 0.21, 15800
    rounded = dry / (1 + (dry / ceiling) ** 4) ** .25
    return signal.sosfilt(signal.ellip(12, .1, 80, cutoff_hz, fs=SR, output="sos"), rounded)


dry = scene()
out = record(dry)
file_out(out)
```